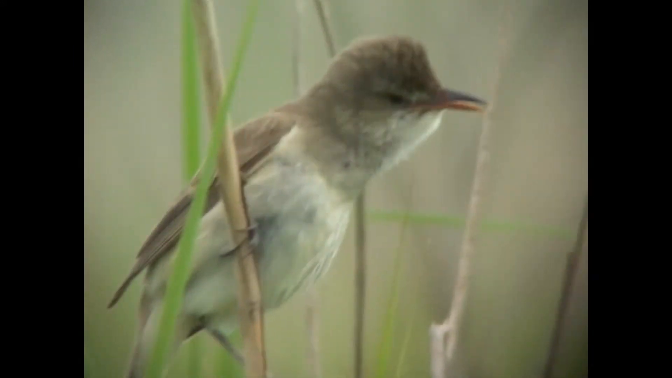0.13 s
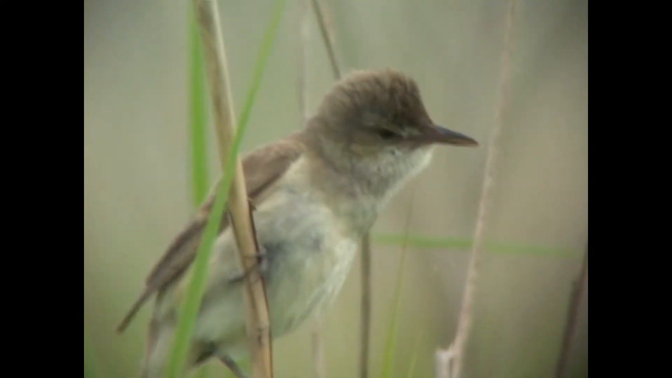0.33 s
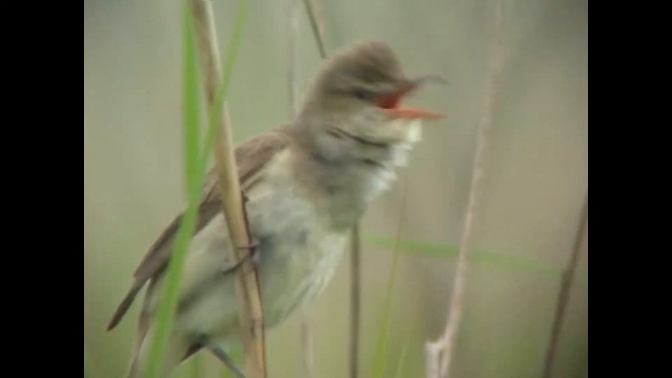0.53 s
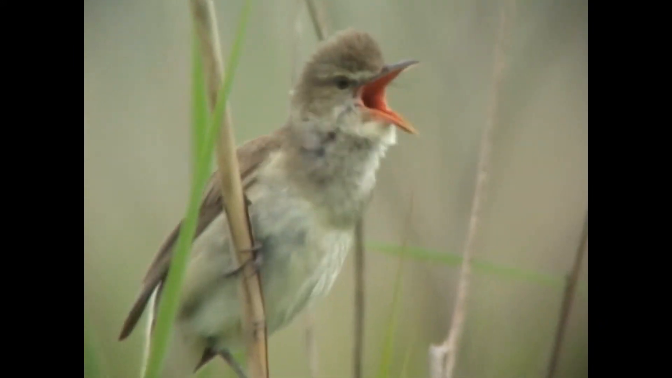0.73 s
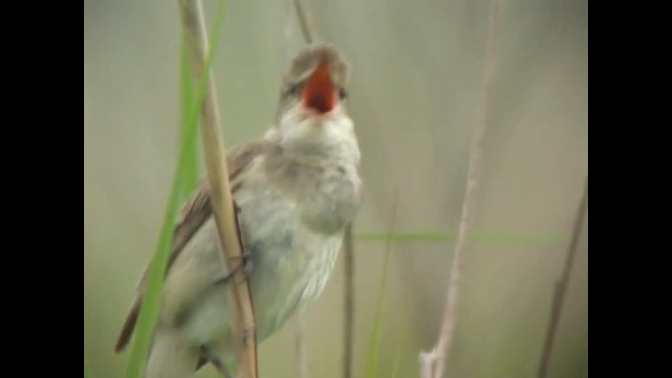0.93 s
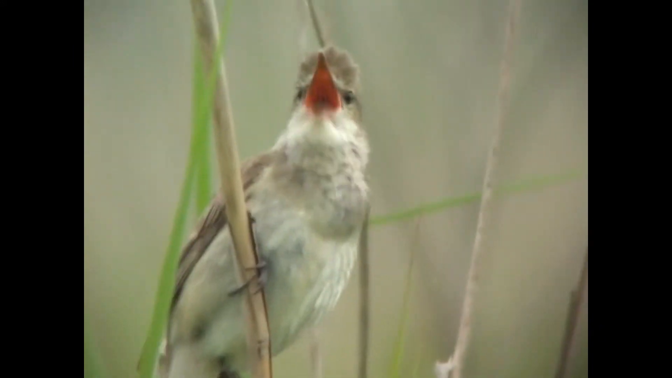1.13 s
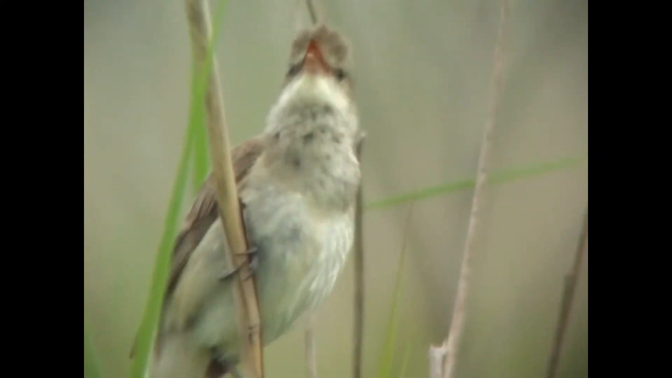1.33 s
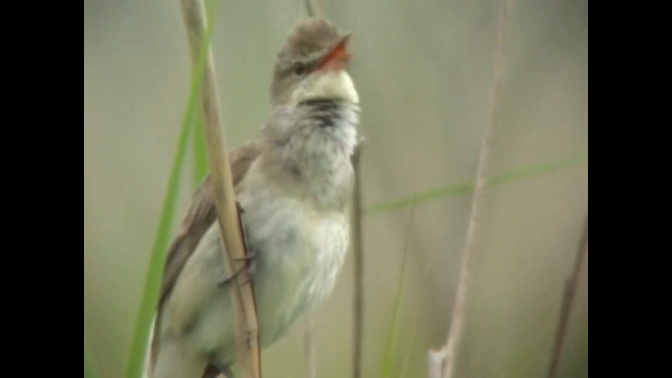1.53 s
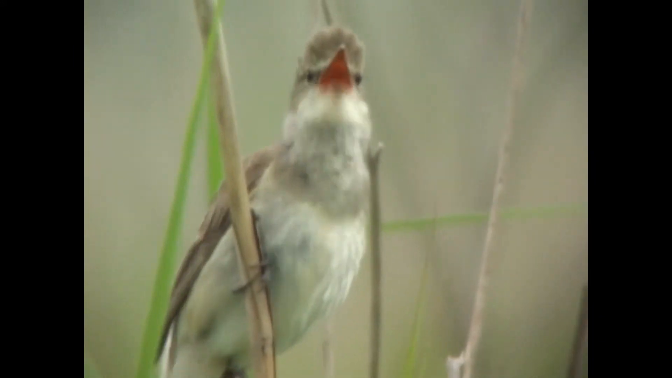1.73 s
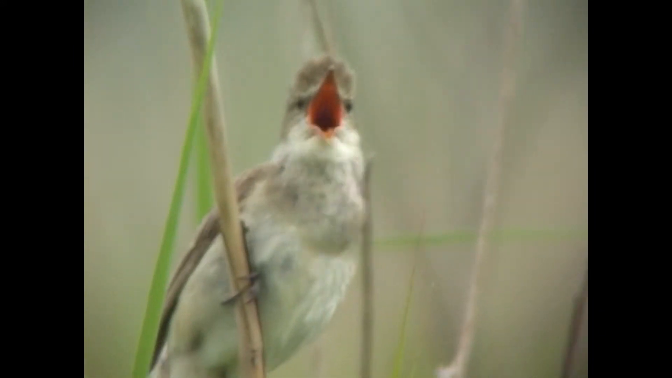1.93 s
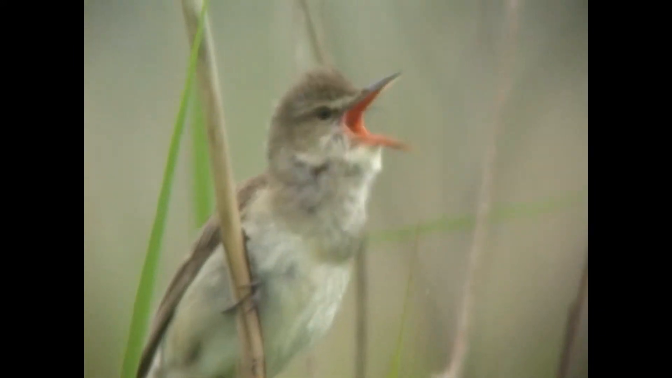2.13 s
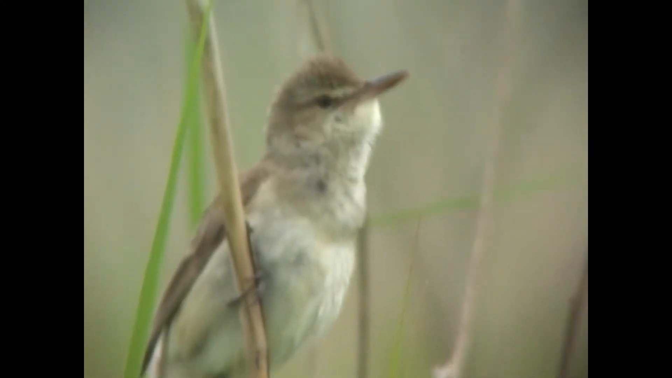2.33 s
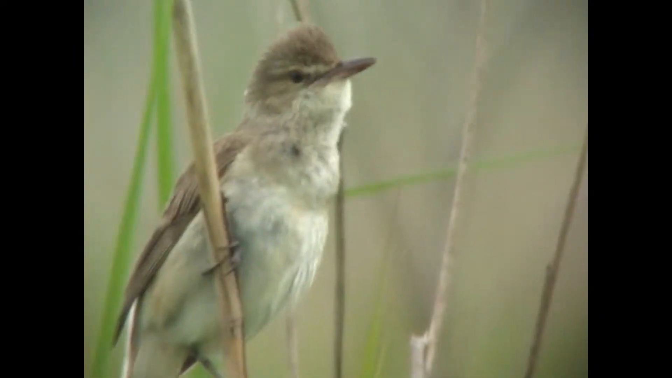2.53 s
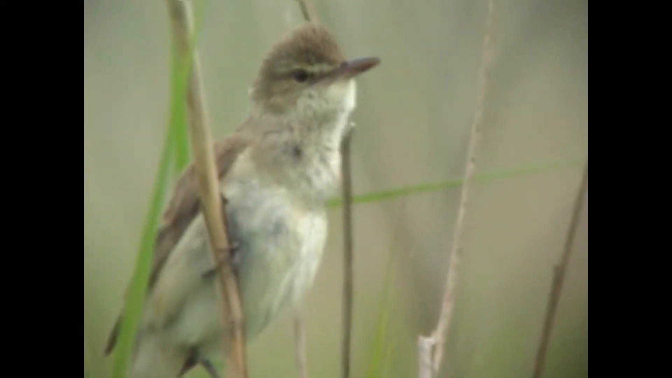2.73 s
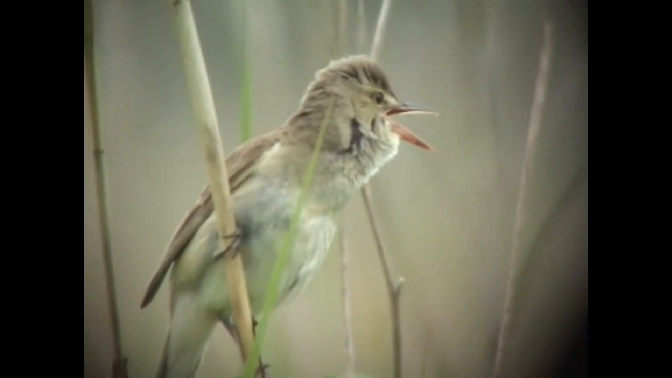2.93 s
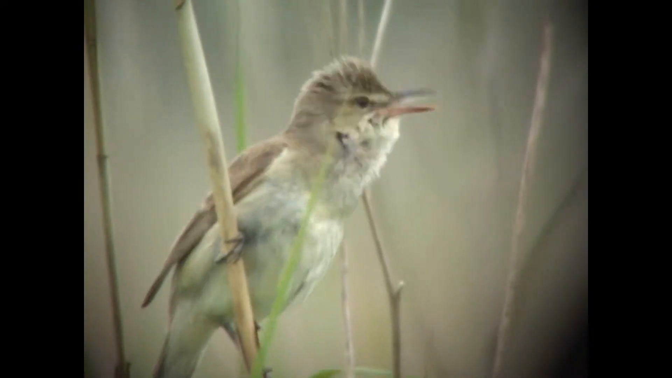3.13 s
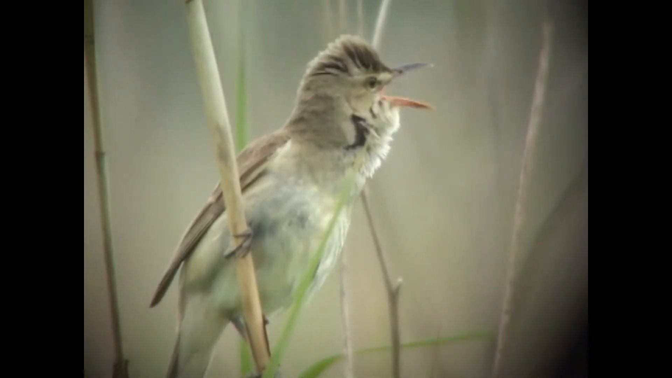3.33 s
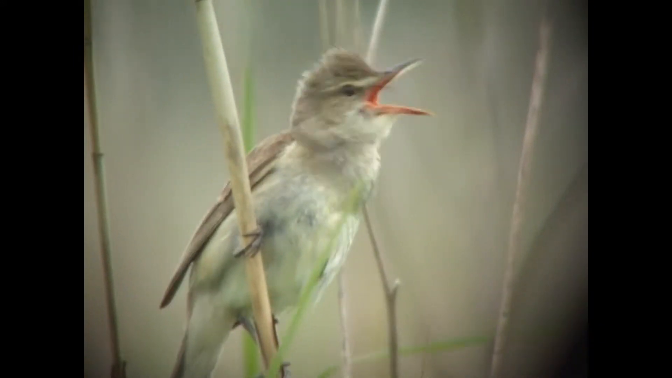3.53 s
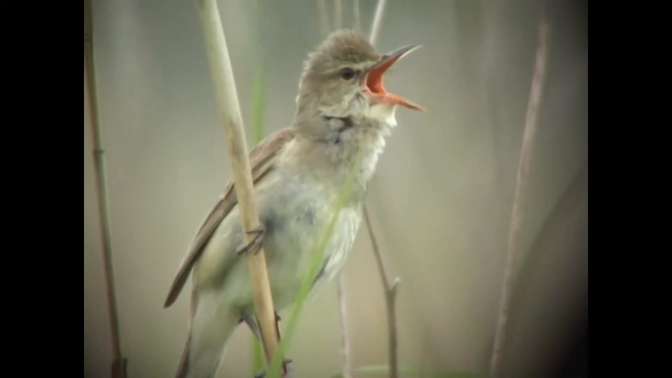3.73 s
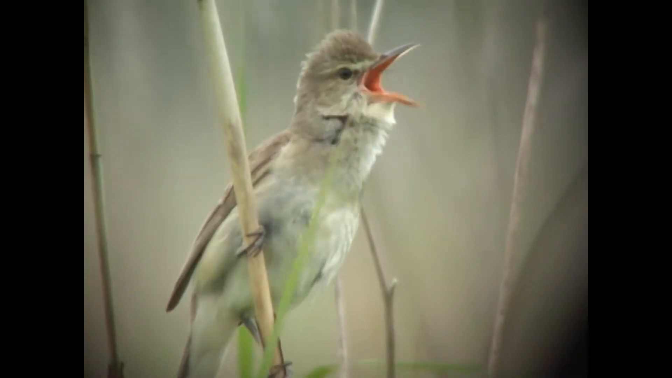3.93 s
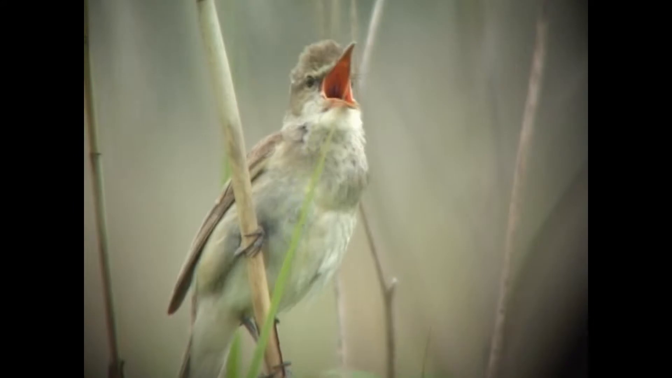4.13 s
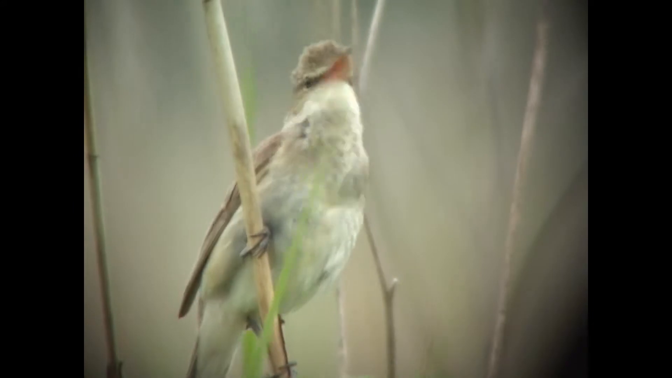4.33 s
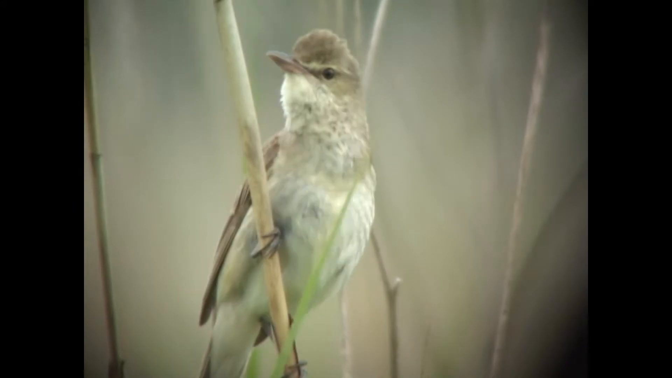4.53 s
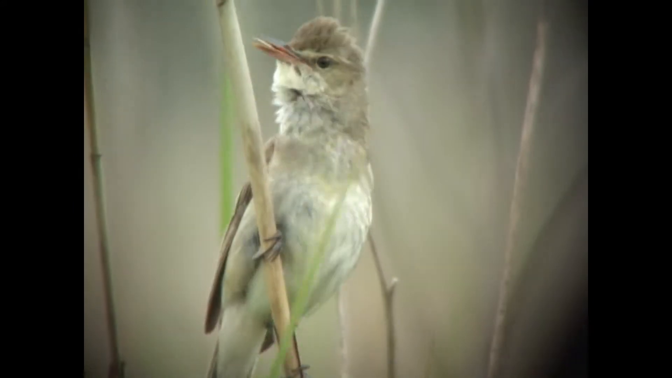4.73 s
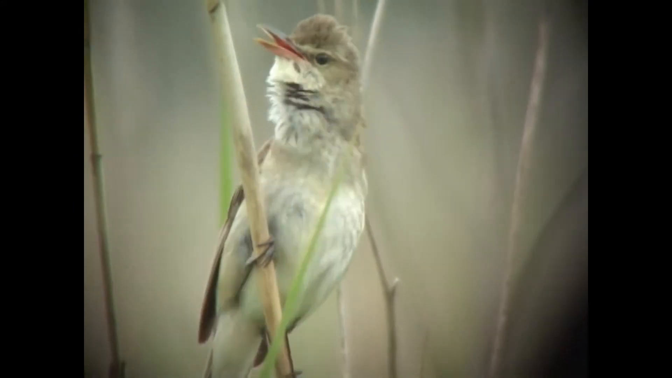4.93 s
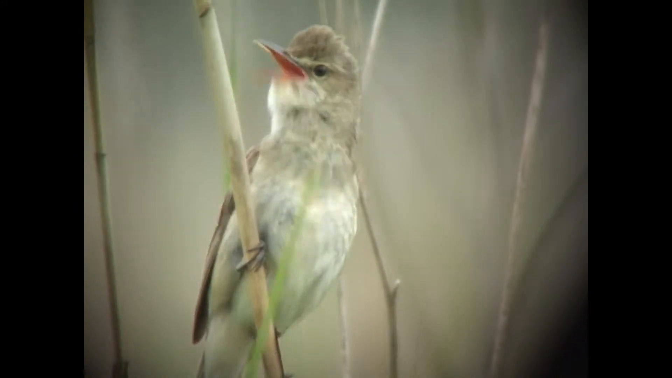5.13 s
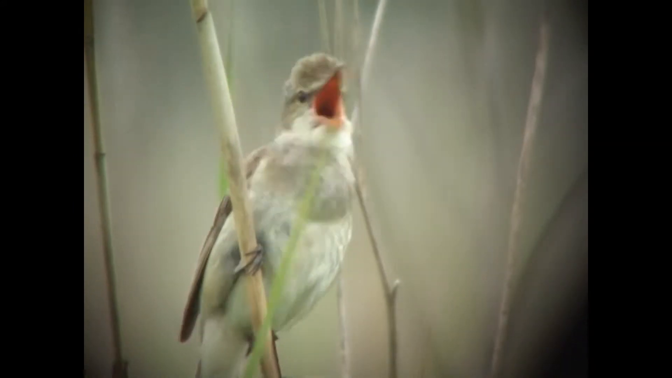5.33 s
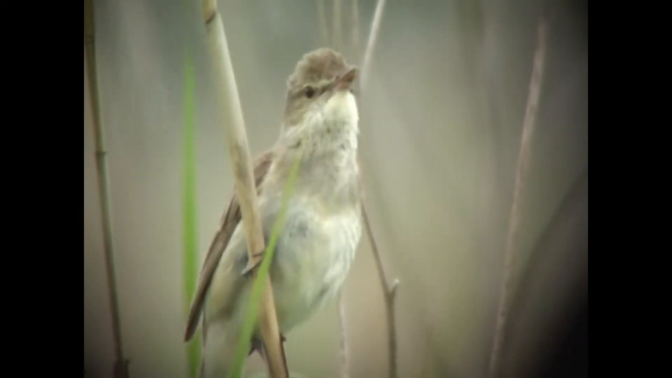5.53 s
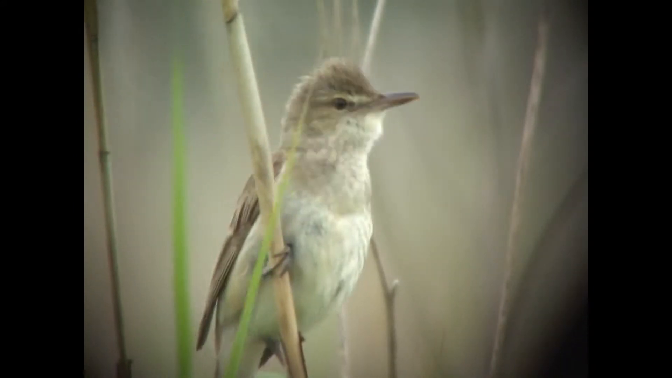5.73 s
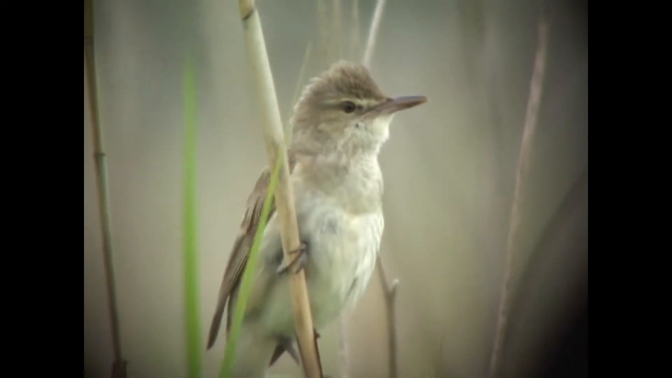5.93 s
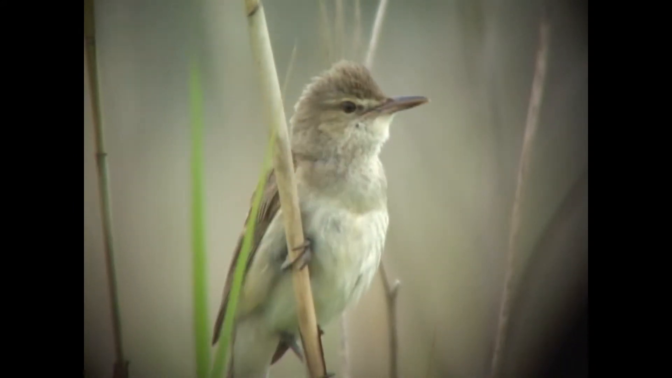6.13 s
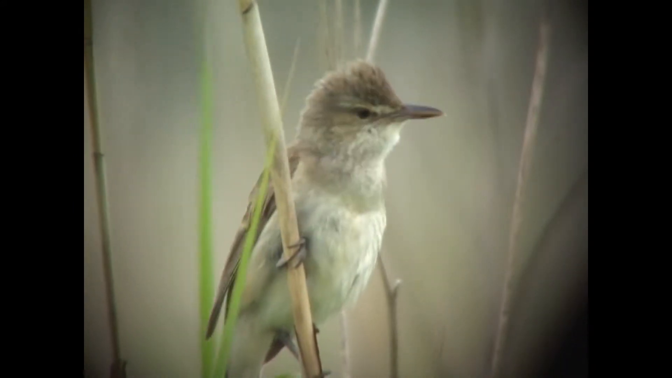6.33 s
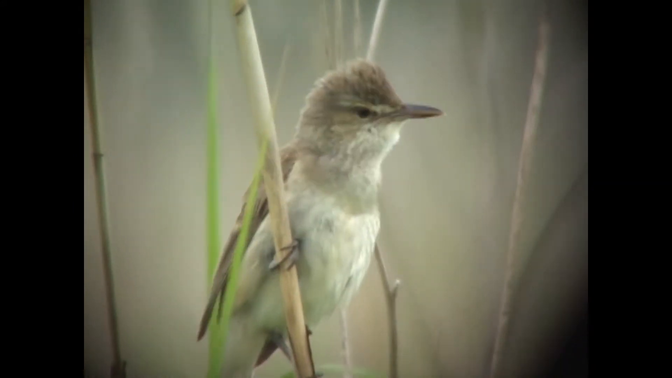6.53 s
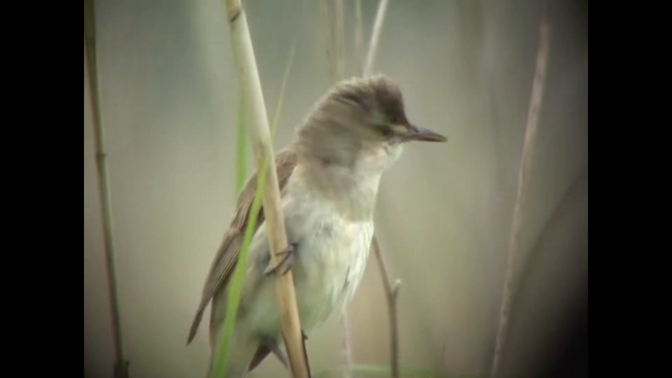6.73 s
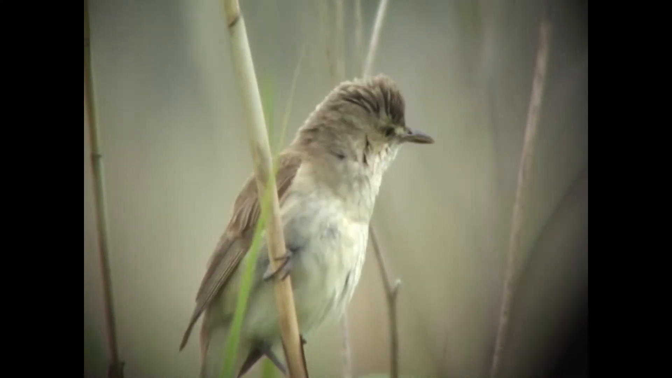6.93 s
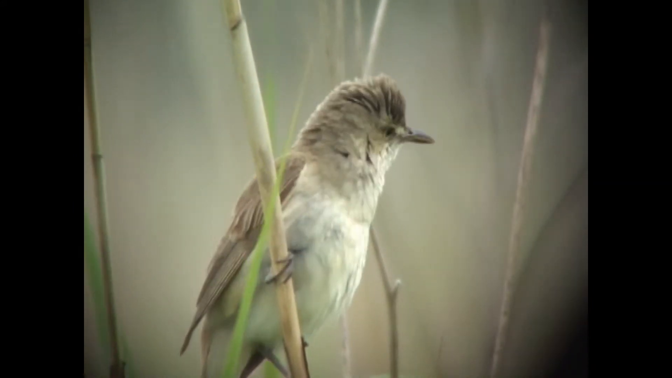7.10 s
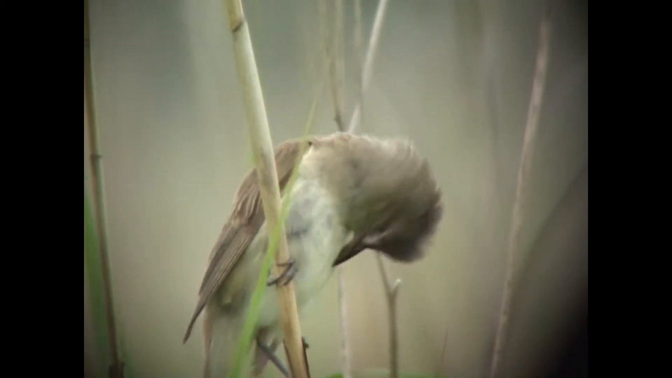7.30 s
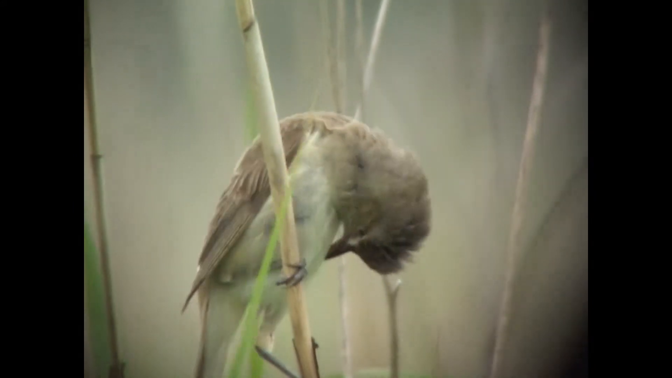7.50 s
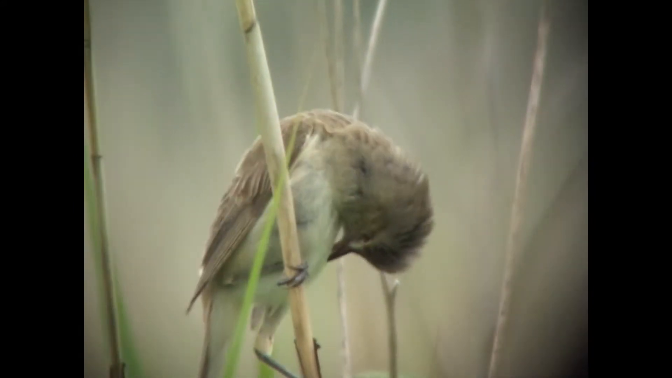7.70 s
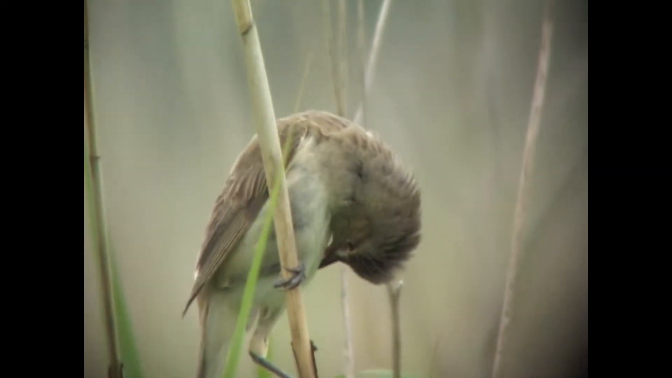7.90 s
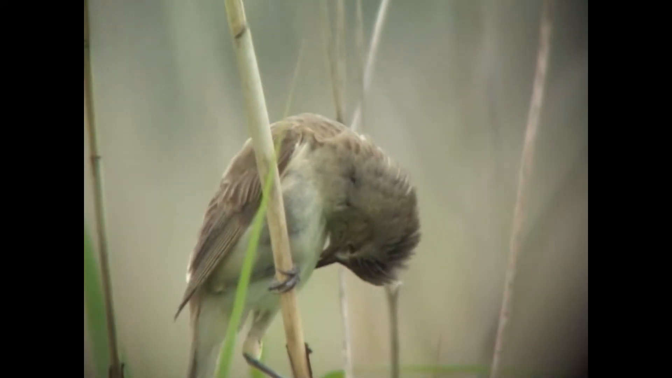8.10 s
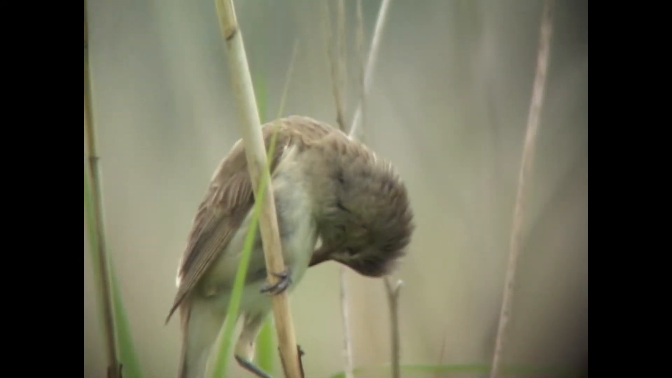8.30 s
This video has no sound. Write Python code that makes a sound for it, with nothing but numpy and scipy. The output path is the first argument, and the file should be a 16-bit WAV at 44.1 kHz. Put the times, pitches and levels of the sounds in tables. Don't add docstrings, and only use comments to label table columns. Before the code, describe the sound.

A reed warbler sings close ahead in reeds: faint stutters and raspy ticks, a squeak, guttural croaks, fast high chatter, dry rattles, then loud sharp rising chirps. After a short gap with soft knocks and squeaks, it repeats croaks, chatter, rattles and softer chirps. Then it stops, leaving quiet hiss, a faint cricket and distant birds. Camera microphones add low wind thuds and a faint motor hum.

```python
import sys
import numpy as np
from scipy import signal
from scipy.fft import rfft, irfft, next_fast_len
from scipy.io import wavfile
from scipy.ndimage import uniform_filter1d, map_coordinates

SR = 44100
rng = np.random.default_rng(int(sys.argv[2]) if len(sys.argv) > 2 else 0)


def boost_factor(decibels):
    exponent = np.asarray(decibels, float) / 20
    return 10 ** exponent


def output_pcm(signal):
    pcm = np.clip(np.atleast_2d(signal).T, -1, 1) * 32767
    wavfile.write(sys.argv[1], SR, np.round(pcm).astype(np.int16))


N = 368676
TIME = np.arange(N) / SR

# time_s, wind_thud_db, outdoor_noise_db
AIR_LEVELS = [
    (0, -61.5, -69),
    (1.35, -66.5, -68),
    (1.55, -52, -68.5),
    (2.098, -59, -70),
    (2.6, -58.5, -67.5),
    (3.1, -61, -69.5),
    (6.6, -64, -66),
    (8.36, -66.5, -68.5),
]
# frequency_hz, density_db_per_hz
HISS_SPECTRUM = [(25, -17.5), (60, -10.5), (110, -27.5), (160, -28.5), (400, -30), (700, -32),
                 (1250, -31.5), (1600, -37), (3000, -31.5), (6000, -36.5), (7600, -37), (10400, -39.5),
                 (10900, -78.5)]
# frequency_hz, correlation
PORT_LIKENESS = [(40, 0.14), (70, -0.28), (170, -0.29), (1360, 0.34), (3840, -0.37), (10900, 0.11)]
# pitch_hz, left_db, right_db, left_lead_rad, unsteady_hz
MOTOR_TONES = [(84.6, -53, -57.5, 0.27, 0.4), (219.3, -70.5, -62.5, 3.88, 2), (566.4, -78, -69, 3.87, 2.76),
               (1104, -104, -73, 2.5, 3.57), (5950, -83.5, -74, 1.8, 26)]
# frequency_hz, left_minus_right_db
PORT_COLOUR = [(2000, -0.5), (3500, 3), (5000, -3), (9000, -3.5)]

# start_s, level_db, centre_hz
STUTTERS = [(0.0013, -54, 2930), (0.0064, -50, 2810), (0.011, -50, 2860), (0.0205, -56, 3460),
            (0.1619, -58, 3210), (0.178, -56, 3040), (0.1863, -52, 2870), (0.1906, -49, 2650),
            (0.1965, -48, 2950), (0.2073, -44, 2790), (0.6712, -60, 3110), (0.675, -53, 2890),
            (0.6808, -54, 3000), (0.8446, -54, 2880), (0.85, -45, 2960), (3.3308, -52, 2860),
            (3.3345, -55, 2920), (3.5027, -52, 3580), (3.5136, -46, 3110), (3.847, -50, 3170),
            (3.8575, -45, 3150), (3.8616, -45, 3320), (4.008, -56, 3690), (4.026, -42, 3100),
            (5.0589, -58, 3320), (5.065, -61, 2790), (5.07, -53, 3520)]
# time_s, main_pitch_hz, level_db
OPENING_RASPS = [
    [(0.029, 2160, -50), (0.04, 2485, -42.5), (0.048, 2490, -45)],
    [(0.216, 2280, -48), (0.224, 2480, -41), (0.236, 2560, -44)],
]
# start_s, level_db, length_s, centre_hz
OPENING_TICKS = [
    (0.0494, -41, 0.0039, 2530),
    (0.0542, -36.5, 0.0022, 2600),
    (0.0575, -38, 0.0067, 2660),
    (0.0658, -37.5, 0.0035, 2600),
    (0.073, -43, 0.004, 2690),
    (0.237, -36, 0.0025, 2660),
    (0.241, -34.5, 0.0049, 2570),
    (0.247, -38.5, 0.0063, 2640),
    (0.2545, -42.5, 0.0054, 2540),
]
# start_s, level_db, length_s, centre_hz
LOOSE_CHIPS = [
    (0.261, -44, 0.0033, 2440),
    (1.517, -50, 0.0028, 3200),
    (1.666, -44.5, 0.007, 2450),
    (3.851, -47, 0.0022, 3100),
    (3.854, -46, 0.0022, 3100),
    (4.017, -47.5, 0.016, 2964),
]
# start_s, level_db, length_s, centre_hz
HIGH_CHATTER = [(1.0207, -44, 0.0071, 3970), (1.0297, -37.5, 0.0045, 4520), (1.0386, -39, 0.01, 4900),
                (1.0732, -31.5, 0.0066, 4520), (1.1103, -33, 0.0073, 4600), (1.121, -30.5, 0.007, 4600),
                (1.1552, -33, 0.0056, 4660), (1.188, -32, 0.0074, 4500), (1.2001, -32, 0.007, 4670),
                (1.215, -42, 0.0079, 4330), (1.2317, -31.5, 0.0075, 4450), (1.2432, -41, 0.0048, 4200),
                (1.2686, -31.5, 0.0095, 4550), (1.283, -31, 0.002, 4560), (1.3109, -32, 0.0063, 4440),
                (1.3255, -45, 0.0042, 3980), (4.184, -34.5, 0.0063, 4530), (4.1955, -29, 0.0067, 4530),
                (4.2288, -30.5, 0.0081, 4220), (4.2678, -32.5, 0.0073, 4230), (4.2799, -31.5, 0.0065, 4620),
                (4.2944, -42, 0.0046, 4500), (4.3087, -31, 0.0066, 4250), (4.3207, -35, 0.0057, 4050),
                (4.3444, -32.5, 0.0077, 4300), (4.3579, -32, 0.0058, 4810), (4.373, -40, 0.0046, 4530),
                (4.3872, -31, 0.0066, 4380), (4.4, -37, 0.003, 4270), (4.4212, -34, 0.0064, 4400),
                (4.434, -32, 0.0067, 4540), (4.453, -44, 0.0034, 4300), (4.4656, -33.5, 0.0061, 4550),
                (4.4727, -37.5, 0.0063, 4200), (4.4859, -52, 0.0051, 4210)]
# start_s, level_db, length_s, centre_hz
LOW_RATTLES = [(1.5698, -32, 0.0024, 2780), (1.5745, -35.5, 0.0075, 2660), (1.5867, -38, 0.0037, 2740),
               (1.597, -38, 0.0069, 2470), (1.6083, -39, 0.006, 2410), (1.618, -38.5, 0.0055, 2600),
               (1.6276, -39.5, 0.0057, 2430), (1.6386, -39.5, 0.006, 2370), (1.647, -44, 0.0065, 2380),
               (1.6597, -41, 0.0058, 2400), (1.778, -32.5, 0.0053, 2700), (1.7857, -34.5, 0.0052, 2620),
               (1.7942, -40, 0.0065, 2650), (1.8049, -38, 0.0041, 2650), (1.8134, -39, 0.0041, 2570),
               (1.8225, -41, 0.0047, 2540), (1.8327, -39, 0.0047, 2450), (1.8444, -40.5, 0.0044, 2490),
               (1.8565, -46, 0.0044, 2400), (1.8657, -45.5, 0.0039, 2560), (4.8317, -42.5, 0.007, 2470),
               (4.8435, -44, 0.0078, 2410), (4.856, -47, 0.0038, 2720), (4.8659, -45, 0.004, 2830),
               (4.876, -47, 0.0032, 2720), (4.8851, -44.5, 0.0029, 2240), (4.8951, -50, 0.0055, 2390),
               (5.1255, -40.5, 0.0095, 2570), (5.1378, -42, 0.0058, 2390), (5.148, -44, 0.0054, 2350),
               (5.157, -44, 0.0068, 2390), (5.168, -42.5, 0.0047, 2400), (5.179, -42.5, 0.0038, 2390),
               (5.1887, -48, 0.0048, 2310)]
# start_s, level_db, length_s
CHIRP_CLICKS = [
    (1.95, -28, 0.013),
    (2.034, -28, 0.012),
    (2.121, -29.5, 0.009),
    (2.215, -30, 0.0097),
    (2.3, -30.5, 0.0095),
    (5.348, -34.5, 0.01),
    (5.437, -34.5, 0.011),
    (5.52, -33.5, 0.011),
    (5.625, -31.5, 0.0094),
]
# time_s, main_pitch_hz, level_db
RATTLE_RASPS = [
    [(1.535, 2340, -48.5), (1.553, 2637, -29), (1.567, 2440, -35.5)],
    [(1.749, 2550, -49), (1.757, 2665, -34), (1.769, 2604, -33), (1.777, 2520, -33)],
    [(4.79, 2610, -44), (4.798, 2670, -39), (4.808, 2686, -39.5), (4.818, 2425, -37.5), (4.831, 2260, -38)],
    [(5.077, 2290, -49), (5.083, 2440, -36.5), (5.101, 2540, -36), (5.119, 2280, -40), (5.125, 2250, -39)],
]
# time_s, pitch_hz, level_db
SQUEAK_PATHS = [
    [(0.356, 5300, -51), (0.372, 5390, -43), (0.39, 5410, -40), (0.405, 5740, -42.5), (0.416, 5950, -40.5),
     (0.432, 5680, -37), (0.445, 5310, -32.5), (0.462, 5370, -53)],
    [(3.082, 4430, -50), (3.095, 4130, -43.5), (3.11, 4070, -47), (3.142, 4260, -56)],
    [(3.142, 4200, -52), (3.165, 4040, -42.5), (3.18, 3930, -47), (3.194, 4100, -52)],
    [(3.69, 6470, -56), (3.703, 7020, -50), (3.712, 6230, -46), (3.722, 6110, -38), (3.731, 4300, -58)],
    [(3.736, 6020, -49), (3.745, 6420, -49), (3.76, 6350, -41), (3.772, 5800, -44.5), (3.782, 4600, -69)],
]
FLUTTER_DEPTHS = [0.95, .35, 0.21, 0.36, .3]
FLUTTER_COURSE = [(0, .1), (.22, .9), (.6, 1), (.7, .45), (.8, .8), (.9, .2), (1, .1)]
# start_s, first_pulse_rate_hz, top_pulse_rate_hz, top_level_db, bright_db_per_ten_partials
CROAK_NOTES = [
    (0.714, 286, 311.7, -34.5, 1),
    (0.883, 302.4, 321, -32.5, 5),
    (3.37, 284, 319.7, -35, -1.5),
    (3.545, 289.3, 310, -33, 0.5),
    (3.893, 295.3, 311.6, -29.5, 3),
    (4.058, 302.7, 312.2, -29, 2.5),
]
# start_s, length_s, end_hz, level_db
RISING_CHIRPS = [
    (1.9703, 0.031, 3730, -16),
    (2.0562, 0.024, 3880, -17),
    (2.141, 0.028, 3880, -19.5),
    (2.234, 0.031, 3975, -17.5),
    (2.321, 0.032, 4080, -21.5),
    (5.368, 0.026, 3630, -22.5),
    (5.457, 0.023, 3790, -22.5),
    (5.541, 0.026, 3880, -24.5),
    (5.647, 0.028, 4050, -23),
]
# start_s, level_db, centre_hz
BEAK_KNOCKS = [
    (2.9, -49.5, 1500),
    (2.956, -54.5, 1900),
    (2.968, -47, 2050),
    (2.98, -46, 1940),
    (3.011, -48.5, 1920),
]
# multiple, level_db
WIDE_THROAT = [(3, -47), (4, -27.5), (5, -24), (6.8, -51), (8, -13.5), (10, -0.5), (11.3, -6), (14, -7),
               (16, -20), (25, -40), (28, -28), (34, -46.5)]
# multiple, level_db
NARROW_THROAT = [(2.5, -36), (4, -15.5), (5.5, -46), (7, -7.5), (8, 5.5), (9, -1), (11.5, -9.5),
                 (14, -22.5), (18, -40), (30, -50)]
# multiple, level_db
CHIRP_PARTIALS = [(.5, -37), (1, -9.5), (1.5, -26), (2, -45), (2.5, -38)]

# start_s, end_s
CRICKET_BURSTS = [
    (0.12, 0.505),
    (1.334, 1.64),
    (2.37, 2.707),
    (2.893, 3.17),
    (3.465, 3.99),
    (4.44, 4.84),
    (5.396, 5.88),
    (6.394, 6.847),
    (7.326, 7.75),
]

# start_s, level_db, centre_hz
RIVAL_TICKS = [(0.448, -54, 3320), (0.805, -52, 3470), (0.83, -51, 3400), (3.041, -57, 2900),
               (3.056, -62, 2700), (3.025, -51.5, 3440), (3.085, -52, 3300), (3.13, -49.5, 3080),
               (3.19, -52.5, 3400), (3.239, -50, 3700), (3.484, -47.5, 3960), (3.991, -46.5, 4104),
               (4.906, -50, 2960), (4.947, -50.5, 2760), (5.03, -52.5, 3720), (5.31, -52, 3300),
               (5.598, -47, 4180), (6.92, -64, 2300)]
# start_s, end_s, ticks_per_s, level_db, centre_hz
RIVAL_RATTLES = [
    (0.26, 0.343, 41, -54.5, 3880),
    (0.464, 0.498, 133, -52, 3320),
    (0.513, .65, 44, -54.5, 3950),
    (3.672, 3.811, 38, -50.5, 4030),
    (4.531, 4.606, 64, -54.5, 3980),
]
# start_s, level_db, length_s, centre_hz
FAR_SCRATCHES = [(5.062, -60, 0.013, 3300), (6.625, -65.5, 0.029, 3000), (7.39, -64.5, .025, 2780),
                 (7.803, -64, .01, 3000), (5.226, -55.5, 0.019, 3000), (5.258, -54.5, 0.029, 2900),
                 (5.8, -61, .02, 3300), (5.83, -58, 0.023, 3620), (7.818, -64, .022, 2400),
                 (8.14, -55.5, 0.013, 3760), (8.167, -62, 0.014, 2930), (8.266, -55, .014, 3800),
                 (8.295, -57, .016, 3220)]
# start_s, level_db
RIVAL_PHRASES = [
    (5.694, -51.5),
    (5.853, -53),
    (6.006, -53.5),
]
# delay_s, length_s, relative_db
CROAKS_IN_PHRASE = [
    (0.003, 0.0087, 1.5),
    (0.016, 0.02, 2.5),
]
# delay_s, relative_db, centre_hz
TICK_IN_PHRASE = (0.004, 12.4, 4660)
# delay_s, length_s, start_hz, end_hz, relative_db
WHOOP_IN_PHRASE = (.05, 0.0217, 1800, 2740, 2.3)
# multiple, level_db
RIVAL_CROAK_PARTIALS = [(1, -3.5), (2, 7), (3, -10)]
# start_s, length_s, start_hz, end_hz, level_db
LEFT_WHISTLES = [
    (5.258, 0.039, 5350, 3780, -59),
    (5.3, 0.021, 2920, 2690, -48.5),
    (5.411, 0.022, 6220, 4030, -36),
    (5.483, 0.022, 5900, 4030, -35),
    (5.568, 0.018, 6000, 3950, -35),
    (8.271, 0.012, 3650, 3685, -56),
    (8.296, 0.012, 3404, 2920, -56),
]
# start_s, length_s, start_hz, end_hz, level_db
AHEAD_WHISTLES = [
    (5.955, 0.011, 4640, 4070, -58),
    (6.43, 0.012, 4660, 4350, -56.5),
    (6.492, 0.018, 4940, 3470, -55),
    (6.63, 0.026, 3040, 2890, -65),
    (7.538, 0.016, 4870, 3960, -58.5),
    (7.593, 0.017, 5160, 3300, -51),
    (7.645, 0.02, 5300, 3280, -48),
]
# start_s, length_s, start_hz, end_hz, level_db
RIGHT_WHISTLES = [
    (1.89, 0.055, 2070, 1440, -57),
    (2.38, 0.023, 2310, 2760, -55),
    (3.278, 0.019, 5000, 3990, -55),
    (3.328, 0.017, 4870, 4130, -53),
    (4.95, 0.066, 2350, 1125, -56.5),
    (5.14, 0.021, 4560, 5350, -58),
]
# start_s, length_s, start_hz, end_hz, level_db
HOOKED_WHISTLES = [
    (0.612, 0.073, 2850, 2850, -66),
    (2.42, 0.046, 1500, 1950, -55),
    (2.52, 0.028, 1690, 1734, -58),
    (2.58, 0.044, 1230, 1310, -63),
    (4.3, 0.34, 1692, 1616, -64.5),
    (4.65, 0.077, 1245, 1566, -57),
    (6.83, 0.17, 3720, 3980, -70),
    (7.26, 0.03, 4020, 3900, -67),
]


def unit(x):
    return x / np.sqrt(np.mean(x ** 2) + 1e-20)


def along(points, hz):
    f, v = np.transpose(points)
    return np.interp(np.log(hz + 1), np.log(f + 1), v)


def wobble(rate, size=N):
    knots = rng.standard_normal(int(size * rate / SR) + 4)
    return map_coordinates(knots, [np.arange(size) * rate / SR])


def filtered(x, response):
    m = next_fast_len(x.shape[-1] + 2048)
    return irfft(rfft(x, m) * response(np.fft.rfftfreq(m, 1 / SR)), m)[..., :x.shape[-1]]


def add(track, s, note):
    part = track[max(round(s * SR), 0):][:len(note)]
    part += note[:len(part)]


def unroll(rows, edge):
    s, *cols = np.transpose(rows)
    t = np.arange(s[0], s[-1], 1 / SR)
    fade = np.clip(np.minimum(t - s[0], s[-1] - t) / edge, 0, 1)
    return fade, [np.interp(t, s, c) for c in cols]


def air():
    s, thud_db, noise_db = np.transpose(AIR_LEVELS)
    z = signal.stft(rng.standard_normal((2, N)), nperseg=512)[2]
    patches = uniform_filter1d(rng.standard_normal(z.shape[1:]), size=6, axis=0)
    patches = uniform_filter1d(patches, size=14, axis=1)
    pair = signal.istft(z * boost_factor(unit(patches)), nperseg=512)[1][:, :N]

    def spread(hz):
        turn = np.arccos(np.clip(along(PORT_LIKENESS, hz), -1, 1)) / 2
        return boost_factor(along(HISS_SPECTRUM, hz)) * np.array([np.cos(turn), np.sin(turn)])

    mid, side = filtered(pair, spread)
    bed = unit(np.array([mid + side, mid - side]))
    low = filtered(bed, lambda hz: 1 / (1 + (hz / 130) ** 4))
    middle = filtered(bed, lambda hz: 1 / (1 + (hz / 1400) ** 4)) - low
    high = bed - low - middle
    thuds = boost_factor(np.interp(TIME, s, thud_db) + 8.5) * unit(low)
    outdoors = boost_factor(np.interp(TIME, s, noise_db) + 4.0) * unit(middle)
    return thuds + outdoors + boost_factor(-62) * unit(high)


def motor():
    out, load_db = np.zeros((2, N)), 1.25 * wobble(6.6)
    for hz, left_db, right_db, lead, unsteady_hz in MOTOR_TONES:
        turns = 2 * np.pi * np.cumsum(hz + unsteady_hz * wobble(12)) / SR
        level = np.sqrt(2) * boost_factor([[left_db], [right_db]] + load_db)
        out += level * np.sin(turns + np.array([[lead], [0]]))
    return out


def reeds(x, t60):
    t = np.arange(SR // 3) / SR
    tail = rng.standard_normal((2, len(t))) * boost_factor(-60 * t / t60) * (t > .003)
    return signal.fftconvolve(x[None], tail / np.linalg.norm(tail[0]), axes=1)[:, :N]


def bell(f, centre, width):
    return np.exp(-.5 * ((f - centre) / width) ** 2)


def chips(rows, pulse_hz, breath, skirt_db, lobe_db, least_hz=300, lowest_hz=900):
    track = np.zeros(N)
    for s, db, length, hz in rows:
        n = max(int(1.25 * length * SR), 40)
        spread = max(0.35 * (hz - 1500), least_hz)
        beats = np.cumsum(pulse_hz * (1 + 0.33 * wobble(600, size=n)) / SR) + rng.random()
        drive = np.diff(np.floor(beats), prepend=0) * boost_factor(2.5 * wobble(780, size=n))
        drive = drive + breath * rng.standard_normal(n)
        ring = unit(filtered(drive, lambda f: bell(f, hz, spread)
                             + boost_factor(skirt_db) * bell(f, hz, 0.29 * spread + 300)))
        ring /= (.3 + np.abs(signal.hilbert(ring))) ** .5
        lobes = filtered(drive, lambda f: bell(f, 1047, 190) + 0.74 * bell(f, 5000, 830)
                         + 0.62 * bell(f, 9500, 900) * (hz / 4500) ** 2)
        u = np.arange(n) / n
        shape = np.clip(np.arange(n) / SR / .0011, 0, 1) * np.clip((1 - u) / 0.48, 0, 1)
        burst = unit(ring) + boost_factor(lobe_db) * lobes / np.std(drive)
        add(track, s - .0004, boost_factor(db) * 1.036 * shape * burst)
    return filtered(track, lambda f: 1 / (1 + (lowest_hz / (f + 1)) ** 8))


def singer_bursts():
    click_hz = 4220
    bursts = LOOSE_CHIPS + HIGH_CHATTER + LOW_RATTLES + OPENING_TICKS
    bursts = bursts + [(s, db, .0024, hz) for s, db, hz in STUTTERS]
    bursts += [(s, db, length, click_hz) for s, db, length in CHIRP_CLICKS]
    bursts += [(s - 0.023, db - 0.8, 0.015, 5900 + 83.5 * db) for s, _, _, db, _ in CROAK_NOTES]
    bursts += [(s, db - 20, .008, click_hz) for s, _, _, db in RISING_CHIRPS]
    return chips(bursts, pulse_hz=602, breath=0.28, skirt_db=-34.5, lobe_db=-6.5, least_hz=452)


def membrane(notes, throat, jitter, odd_db, shimmer_db, drift, ends_db):
    track, k = np.zeros(N), np.arange(1, 35)[:, None]
    for rows in notes:
        fade, (hz, db, bright_db) = unroll(rows, edge=0.0012)
        n = len(hz)
        hz = hz * (1 + jitter * wobble(261, size=n))
        opening = np.linspace(-1, 1, n) ** 2
        flicker_db = shimmer_db * np.clip(k / 10, 1, 1.5) * np.array([wobble(143.5, size=n) for _ in k])
        uneven_db = odd_db * (k % 2) * np.clip(2.4 - k / 10, .7, 1.4)
        tilt_db = (bright_db + ends_db * opening) * np.clip(k / 10 - 1, -1, 1)
        gains = boost_factor(along(throat, k) + uneven_db + tilt_db + flicker_db)
        slip = drift * np.clip(abs(k - 9) / 4, .3, 2) * np.array([wobble(280, size=n) for _ in k])
        turns = 2 * np.pi * np.cumsum(hz) / SR
        stack = np.sum(gains * np.sin(k * turns - 0.3 * k ** 2 + slip), axis=0)
        stack *= 1 + .22 * wobble(900, size=n)
        add(track, rows[0][0], boost_factor(db) * fade * stack / np.sqrt(np.sum(gains ** 2, axis=0) / 2))
    return track


def rasps():
    notes = [[(s, hz / 8, db, 0) for s, hz, db in rows] for rows in OPENING_RASPS + RATTLE_RASPS]
    return membrane(notes, NARROW_THROAT, jitter=0.012, odd_db=0, shimmer_db=4, drift=1.5, ends_db=3)


def cricket():
    edges = [np.clip(np.minimum(TIME - s, end - TIME) / 0.0063, 0, 1) for s, end in CRICKET_BURSTS]
    strokes = np.clip(np.sin(2 * np.pi * np.cumsum(101 + wobble(12)) / SR) + 0.24, 0, None) ** 1.3
    ring = np.sin(2 * np.pi * np.cumsum(7100 + 160 * wobble(700)) / SR)
    song = boost_factor(-79) * sum(edges) * unit(strokes * ring)
    direct = np.array([boost_factor(-23.5) * np.roll(song, shift=2), boost_factor(15) * song])
    return direct + boost_factor(2.0) * reeds(song, t60=.1)


def squeaks():
    track = np.zeros(N)
    for rows, flutter in zip(SQUEAK_PATHS, FLUTTER_DEPTHS):
        fade, (hz, db) = unroll(rows, edge=0.0022)
        n = len(hz)
        depth = flutter * np.interp(np.linspace(0, 1, n), *np.transpose(FLUTTER_COURSE))
        beat = 2 * np.pi * np.cumsum(135 + 35 * wobble(35.8, size=n)) / SR
        turns = 2 * np.pi * np.cumsum(hz * (1 + .03 * depth * np.cos(beat))) / SR
        upper_turns = np.cumsum(np.linspace(1.3, 1.9, n) * np.gradient(turns))
        leak = boost_factor(-1.5) * np.sin(0.89 * turns) + boost_factor(-12.5) * np.sin(upper_turns)
        leak *= wobble(1443, size=n)
        tone = (1 + np.clip(depth, 0, 1) * np.sin(beat)) * np.sin(turns)
        tone += boost_factor(-34.5) * np.sin(2 * turns)
        beat_click = depth * np.exp(4 * (np.cos(beat) - 1))
        add(track, rows[0][0], boost_factor(db + 4.5) * fade * (tone + beat_click * leak))
    return track


def bent(rows, bend):
    return [(s, length, a, a + bend * (b - a), b, db) for s, length, a, b, db in rows]


def glides(rows, tone, rise, fall, rough, hook=1):
    track = np.zeros(N)
    for s, length, start_hz, mid_hz, end_hz, db in rows:
        u = np.linspace(-1, 1, int(length * SR))
        n = len(u)
        v = 2 * ((u + 1) / 2) ** hook - 1
        hz = mid_hz + v * (end_hz - start_hz) / 2 + v ** 2 * ((end_hz + start_hz) / 2 - mid_hz)
        turns = 2 * np.pi * np.cumsum(hz * (1 + rough * wobble(416, size=n))) / SR
        shape = np.clip((u + 1) / rise, 0, 1) * np.clip((1 - u) / fall, 0, 1)
        shape = shape * boost_factor(0.65 * wobble(330, size=n))
        note = np.zeros(n)
        for k, gain_db in tone:
            flicker = boost_factor(1.3 * (k != 1) * wobble(142, size=n)) * shape ** max(k, 1)
            note += boost_factor(gain_db) * flicker * np.sin(k * turns)
        add(track, s, boost_factor(db) * note)
    return track


def placed(x, left_db, lead, wet_db):
    direct = np.array([boost_factor(left_db / 2) * x, boost_factor(-left_db / 2) * np.roll(x, lead)])
    return direct + boost_factor(wet_db) * reeds(x, t60=0.28)


def rival():
    ticks = RIVAL_TICKS + [(t, db, hz) for s, end, rate, db, hz in RIVAL_RATTLES
                           for t in np.arange(s, end, 1 / rate)]
    delay, more_db, tick_hz = TICK_IN_PHRASE
    ticks += [(s + delay, db + more_db, tick_hz) for s, db in RIVAL_PHRASES]
    bursts = [(s, db, .008, hz) for s, db, hz in ticks] + FAR_SCRATCHES
    song = chips(bursts, pulse_hz=412.4, breath=0.12, skirt_db=-30, lobe_db=-32)
    croaking = [(s + delay, length, 1620, 1720, 1680, db + more_db) for s, db in RIVAL_PHRASES
                for delay, length, more_db in CROAKS_IN_PHRASE]
    song += glides(croaking, RIVAL_CROAK_PARTIALS, rise=0.4, fall=0.6, rough=0.05)
    delay, *sweep, more_db = WHOOP_IN_PHRASE
    whoops = [(s + delay, *sweep, db + more_db) for s, db in RIVAL_PHRASES]
    song += glides(bent(LEFT_WHISTLES + whoops, bend=.78), [(0.99, 0)], rise=0.31, fall=0.19, rough=.008)
    return placed(song, 7.3, 4, wet_db=-7.5)


def far_whistlers():
    right = bent(RIGHT_WHISTLES, bend=0.38) + bent(HOOKED_WHISTLES, bend=1.2)
    right = glides(right, [(1, 0)], rise=0.43, fall=0.08, rough=0.0044)
    ahead = bent(AHEAD_WHISTLES, bend=0.234)
    ahead = glides(ahead, [(0.99, 0)], rise=0.092, fall=0.95, rough=.008)
    return placed(right, 0.83, -3, wet_db=-10.0) + placed(ahead, -1, 0, wet_db=-12)


def croaks():
    length_s, notes = .073, []
    for s, first_hz, hz, db, bright_db in CROAK_NOTES:
        course = [(0, first_hz, -2.5), (.2, first_hz, -2.5), (.6, hz, 0), (.76, hz, -1), (1, .93 * hz, -13)]
        notes.append([(s + part * length_s, rate_hz, db + more_db, bright_db)
                      for part, rate_hz, more_db in course])
    return membrane(notes, WIDE_THROAT, jitter=.005, odd_db=-8, shimmer_db=2.3, drift=.35, ends_db=-9)


def chirps():
    rows = [(s, length, 2790, end_hz, db) for s, length, end_hz, db in RISING_CHIRPS]
    return glides(bent(rows, bend=.62), CHIRP_PARTIALS, rise=0.097, fall=1.4, rough=0.009, hook=.33)


def knocks():
    rows = [(s, db, .008, hz) for s, db, hz in BEAK_KNOCKS]
    return chips(rows, pulse_hz=485, breath=0.42, skirt_db=-23, lobe_db=-6, least_hz=900, lowest_hz=700)


def scene():
    song = singer_bursts() + rasps() + squeaks() + croaks() + chirps() + knocks()
    near = filtered(song, lambda hz: boost_factor(along(PORT_COLOUR, hz) / 2 * np.array([[1], [-1]])))
    near += boost_factor(-16.5) * reeds(song, t60=0.14)
    return air() + motor() + near + cricket() + rival() + far_whistlers()


def low_pass(x):
    return signal.sosfilt(signal.butter(12, 11470, fs=SR, output="sos"), x)


def record(dry):
    mix = filtered(dry, lambda hz: 1 / (1 + (hz / 10750) ** 60))
    return low_pass(mix)


dry = scene()
out = record(dry)
output_pcm(out)
```